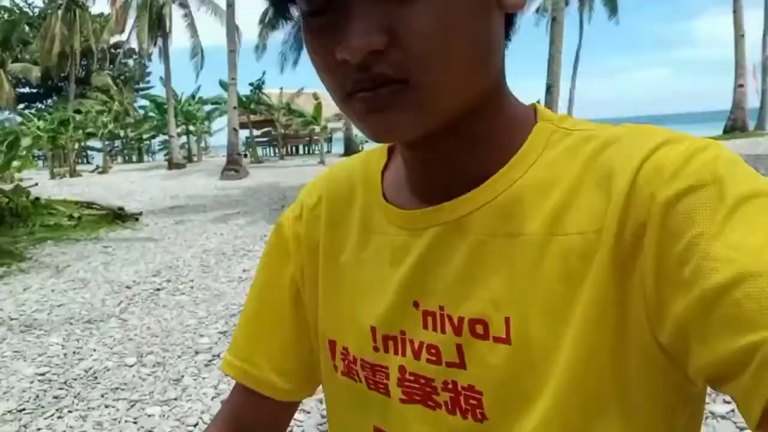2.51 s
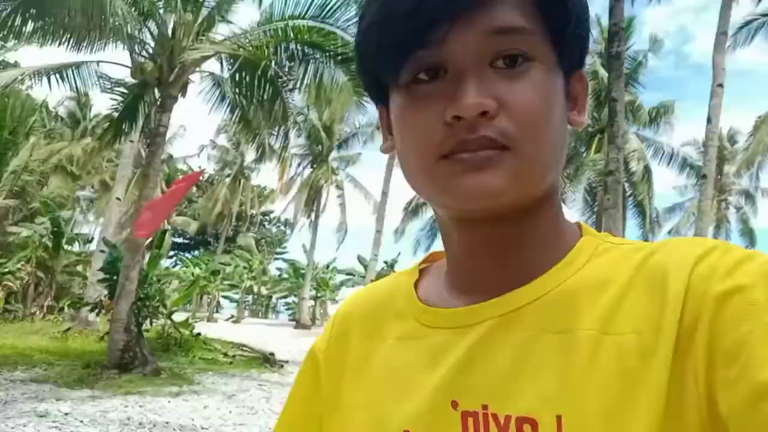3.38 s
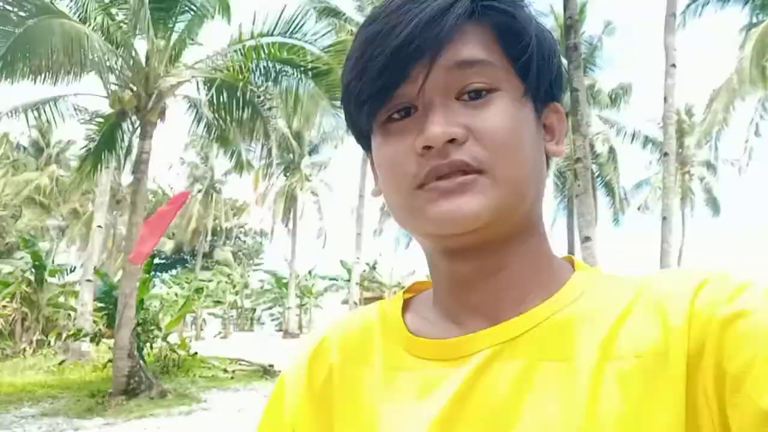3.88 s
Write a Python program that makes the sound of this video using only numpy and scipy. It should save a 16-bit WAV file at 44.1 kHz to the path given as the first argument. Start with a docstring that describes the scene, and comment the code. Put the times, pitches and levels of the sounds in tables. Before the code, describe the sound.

Someone walks at an even pace across a pebble beach, stones grinding and clicking underfoot, with a light breeze behind.

```python
"""Crunching footsteps at a steady pace on a beach of smooth loose pebbles.
Heel, then forefoot, each set off many small stone contacts over duller knocks deeper in the bed;
the stones then settle. Feet scuff, single stones clack and chink, trapped sand fizzes under load.
Behind: a shore hush, the rumble of a rising breeze and a thin tone that comes and goes."""
import sys
import numpy as np
from scipy import signal
from scipy.fft import rfft, irfft
from scipy.io import wavfile
from scipy.ndimage import uniform_filter1d

SR = 44100
rng = np.random.default_rng(int(sys.argv[2]) if len(sys.argv) > 2 else 0)


def put_to_file(sound):
    """Save the sound as 16-bit audio at rate SR, in the file named by the first command-line argument."""
    columns = np.atleast_2d(sound).T  # one column per channel
    safe = np.clip(columns, -1, 1)
    whole_steps = np.round(safe * 32767)
    wavfile.write(sys.argv[1], SR, whole_steps.astype(np.int16))


N = 176716
TIME_S = np.arange(N) / SR

# Table levels are relative, ahead of layer gains and filters.
# footfalls: heel (t/s, crunch level/dB, knock level/dB, hold/s), forefoot (same four),
# top stone f/Hz, buried stone f/Hz
FOOTFALLS = [(-0.02, -17.5, -46.5, .008, 0.046, -37, -56, .026, 4050, 600),
             (0.536, -27.5, -54, .025, 0.575, -32, -47.5, .073, 3600, 630),
             (1.093, -21, -40.5, .015, 1.15, -41, -61, .023, 3500, 660),
             (1.567, -27.5, -41, .035, 1.644, -50, -55, .015, 3300, 720),
             (2.111, -22.5, -41, .018, 2.183, -31, -43, .014, 3400, 700),
             (2.626, -15.5, -35, .004, 2.648, -22, -35, .022, 3600, 590),
             (3.04, -22.5, -47, .043, 3.113, -32, -39.5, .05, 3900, 720),
             (3.592, -20.5, -33, .01, 3.671, -39.5, -51, .031, 3150, 910)]
# foot brushes or pushes off: t/s, hold/s, crunch level/dB, knock level/dB
FOOT_SCUFFS = [(0.412, 0.004, -38.5, -45.5), (0.491, 0.04, -49, -55.5), (0.7, 0.096, -49.1, -63.5),
               (0.898, 0.075, -51.5, -59.5), (0.969, 0.098, -37.5, -49), (1.468, 0.077, -56.5, -62),
               (1.685, 0.068, -43.0, -56), (2.014, 0.064, -52.0, -58.5), (2.463, 0.086, -48.5, -55.5),
               (2.59, 0.0071, -23, -40), (2.904, 0.05, -44.5, -55), (2.997, 0.021, -38.5, -39.5),
               (3.203, 0.057, -36.5, -46.5), (3.277, 0.005, -29, -44.5), (3.475, 0.034, -47.7, -62.5),
               (3.508, 0.069, -44, -50.5)]
# single stones slip and strike: t/s, level/dB (first 5 ms), f/Hz, rattle/ms
STONE_CLACKS = [(0.0205, -10, 5960, 3.6), (0.072, -32, 3540, 4.2), (0.1092, -33.5, 3450.0, 3.4),
                (0.1638, -39, 3940.0, 2.9), (0.24, -62, 4850, 2.9), (0.3252, -54.5, 4130, 4.1),
                (0.4115, -28.0, 3120, 3.3), (0.5292, -25.5, 3500.0, 5.1), (0.5471, -24.5, 3860.0, 3.4),
                (0.553, -25.5, 3480, 2.2), (0.585, -21, 3580, 6.5), (0.597, -22, 3400, 4.87),
                (0.6192, -30, 3000.0, 2.7), (0.6355, -21.5, 3900.0, 4.1), (0.6834, -38.5, 3090.0, 1.8),
                (0.76, -40.5, 3824, 2.9), (0.9073, -46.5, 2110.0, 2.3), (0.9743, -34.5, 3260, 2.1),
                (1.013, -23, 4743, 2.8), (1.0454, -31, 3030, 4.7), (1.0673, -18, 4078, 3.78),
                (1.0874, -22.5, 3350, 1.6), (1.1545, -31.5, 3440.0, 5.1), (1.169, -32, 2280, 1.6),
                (1.2298, -44, 3644, 2.9), (1.476, -45.5, 1590.0, 5.1), (1.5046, -47.4, 2827, 2.5),
                (1.535, -44, 3700, 4.3), (1.5645, -25.5, 1970, 2.45), (1.5746, -23.2, 3130, 2.4),
                (1.581, -20.1, 3703, 5.3), (1.593, -21.5, 3730, 2.8), (1.6375, -28.5, 3430, 4.8),
                (1.6547, -28, 2370, 1.6), (1.6918, -35, 3040, 2.1), (1.7162, -22, 5996, 2.4),
                (1.7406, -21, 4530, 2.0), (1.7876, -33.5, 3895, 5.6), (1.8315, -48.5, 3796, 3.9),
                (2.103, -18.5, 4200.0, 4.7), (2.1548, -32, 2920, 3.8), (2.212, -27.5, 3500.0, 2.26),
                (2.2497, -34, 3010, 2.5), (2.3063, -48, 2160.0, 2.9), (2.458, -35.5, 3039, 3.95),
                (2.5933, -18.5, 4567, 2.8), (2.6236, -12.5, 4070, 5.1), (2.6495, -13, 4320, 5.3),
                (2.7343, -34.5, 3582, 3.78), (2.751, -26.5, 3240, 3.7), (2.799, -35.0, 3060, 2.5),
                (2.835, -38.5, 3845, 3.24), (2.9046, -38.5, 3570, 3.1), (2.9441, -41.5, 2298, 2.5),
                (3.012, -28, 2500, 6.3), (3.0437, -12.5, 5140.0, 10.3), (3.0837, -23, 4256, 2.3),
                (3.09, -20, 4501, 3.4), (3.1286, -24.5, 3540, 4), (3.1399, -22.5, 4640, 4.8),
                (3.1636, -17, 3840, 4.2), (3.2143, -31, 4039, 1.98), (3.2255, -35, 3020.0, 2.46),
                (3.2729, -23.5, 3224, 2.74), (3.3032, -38.5, 3180, 2.1), (3.575, -21.1, 3651, 2.51),
                (3.6037, -12, 4110.0, 2.85), (3.6575, -23.5, 3800, 1.91)]
# small hard stones ring: t/s, level/dB, f/Hz, ring/ms
STONE_CHINKS = [(0.0204, -26, 8520, 2.5), (0.42, -35, 8230, 2), (0.598, -32.5, 8650, 2.9),
                (0.636, -28, 11760, 4.2), (0.96, -38.5, 9140, 3.4), (1.013, -35, 9910, 3),
                (1.099, -21.5, 8530, 1.2), (1.558, -29, 9130, 2.7), (1.581, -30, 9560, 2.3),
                (1.716, -22, 10000, 1), (2.1055, -33, 10520, 1.37), (2.4653, -48.5, 9444, 4.1),
                (2.5139, -35.5, 9735, 3.84), (2.556, -45, 9900, 6), (2.5824, -41.5, 9914, 3),
                (2.6282, -29, 9050, 3.5), (3.0093, -33, 9900, 2.9), (3.042, -30.5, 9002, 3),
                (3.1203, -36.5, 10100, 2.7), (3.6017, -26, 8765, 3)]
# pebble bed response: f/Hz, level/dB
BED_RESPONSE = [(150, -28), (500, -4), (1000, -4), (1600, 1), (2200, -2), (3500, 1.5), (4300, -0.5),
                (5400, 3.5), (6500, -4.5), (7500, -7.5), (10500, -1), (13000, -38), (15500, -11)]
# shore hush spectrum: f/Hz, level/dB
HUSH_SPECTRUM = [(20, -43), (45, -16), (100, -4.5), (200, -8), (400, -12.5), (800, -14), (1500, -15),
                 (3200, -15), (5000, -23.5), (7200, -25), (8200, -40.5), (15000, -47)]
# breeze gusts: centre t/s, half length/s, level/dB
BREEZE_GUSTS = [(2.22, 0.023, -58.5), (2.55, .04, -53), (2.68, 0.03, -53), (2.96, 0.063, -57),
                (3.41, 0.033, -57), (3.73, 0.025, -54), (3.87, 0.041, -59.5)]
# swells of the thin tone: centre t/s, half length/s, level/dB
THIN_TONE_SWELLS = [(0.42, .06, -58), (0.78, .1, -59), (1.8, .08, -55.5), (2.82, .14, -61),
                    (3.78, .12, -62)]

ATTACK_S, PRESS_RELEASE_DB_PER_S, SCUFF_RELEASE_DB_PER_S = .011, 512, 606.5
SETTLE_DB, SETTLE_DB_PER_S = -12.5, 130  # level re press
STIR_DB = -68  # stones between steps


def footsteps():
    """Top stones, coloured by the bed, sound over buried stones, grit and chinks."""
    top_db, buried_db = footwork_db(buried=False), footwork_db(buried=True)
    stones = colour(crunch(top_db) + clacks(), BED_RESPONSE) + deep_knocks(buried_db)
    stones = stones + resonance(stones, 1270, width_hz=60)  # blows leave a faint narrow ring
    return muffle(stones) + grit(top_db) + chinks()


def footwork_db(buried):
    """Level of top or buried stones: heel and forefoot presses, settling, scuffs."""
    power = undb(STIR_DB) ** 2
    for step in FOOTFALLS:
        for start_s, *db, hold_s in (step[:4], step[4:8]):
            push = press(start_s, hold_s, PRESS_RELEASE_DB_PER_S)
            settling = undb(SETTLE_DB) * press(start_s, hold_s, SETTLE_DB_PER_S)
            power += (undb(db[buried]) * (push + settling)) ** 2
    for start_s, hold_s, *db in FOOT_SCUFFS:
        power += (undb(db[buried]) * press(start_s, hold_s, SCUFF_RELEASE_DB_PER_S)) ** 2
    return 10 * np.log10(power)


def press(start_s, hold_s, release_db_per_s):
    """Gain of one push on the stones: quick rise, hold, steady decay."""
    early_s = np.maximum(start_s - TIME_S, 0)
    late_s = np.maximum(TIME_S - start_s - hold_s, 0)
    return np.exp(-2 * early_s / ATTACK_S) * undb(-release_db_per_s * late_s)


def stone_hz(buried):
    """Each step finds stones of another size; larger ones ring lower."""
    steps = np.array(FOOTFALLS)
    return np.interp(TIME_S, steps[:, 0], steps[:, 9 if buried else 8])


def crunch(level_db):
    """Top stones grind past each other under the sole."""
    return undb(-1) * grains(level_db, stone_hz(buried=False), slots=10000, octaves=1.792,
                             spread_db=13.5, cycles=3.6, rattle_db=-27.5, samples=384)


def clacks():
    """Single stones snap out from under the foot and hit their neighbours."""
    times_s, db, hz, rattle_ms = np.transpose(STONE_CLACKS)
    sounds = contacts(hz, cycles=1.25, rattle_ms=np.clip(rattle_ms, .5, 10),
                      rattle_db=-22.5, samples=1024)
    onset_rms = np.sqrt(np.mean(sounds[:, :SR // 200] ** 2, axis=1))
    return undb(1) * place(times_s, sounds * (undb(db) / onset_rms)[:, None])


def deep_knocks(level_db, low_cut_hz=344):
    """Weight shifts larger, buried stones, still too small to radiate much bass."""
    knocks = undb(-2.5) * grains(level_db, stone_hz(buried=True), slots=2500, octaves=.829,
                                 spread_db=7.5, cycles=3.6, rattle_db=-47.5, samples=1536)
    return signal.sosfilt(signal.butter(2, low_cut_hz, "highpass", fs=SR, output="sos"), knocks)


def chinks(rise_s=.00023, crack_s=.0022):
    """Small stones ring briefly at their own high pitch after a tiny crack of contact."""
    times_s, db, hz, ring_ms = np.transpose(STONE_CHINKS)[:, :, None]
    t = TIME_S[:SR // 25]
    ring = np.sin(2 * np.pi * hz * t) * (1 - np.exp(-t / rise_s)) * np.exp(-1000 * t / ring_ms)
    noise = rng.standard_normal(ring.shape)
    crack = resonance(resonance(noise, 9500, 5000), 9500, 5600) * np.exp(-t / crack_s)
    return undb(-3.5) * place(times_s[:, 0], undb(db) * (ring + undb(1.5) * crack))


def grit(crunch_db, load_db=-23.5, extra_db_per_db=.2):
    """Sand crushed between the stones fizzes faintly, mostly under full weight."""
    fizz_db = crunch_db + extra_db_per_db * (crunch_db - load_db)
    return undb(-32.5) * grains(fizz_db, centre_hz=8300, slots=10000, octaves=.99,
                                spread_db=13, cycles=5.6, rattle_db=-28, samples=192)


def grains(level_db, centre_hz, slots, octaves, spread_db, cycles, rattle_db, samples):
    """Random contacts, at most one per time slot; under more load more stones move and strike harder."""
    jitter, pitch, strength, chance = rng.random((slots, 4)).T
    times_s = (np.arange(slots) + jitter) * N / SR / slots
    db = np.interp(times_s, TIME_S, level_db)
    hz = np.interp(times_s, TIME_S, centre_hz * np.ones(N)) * 2 ** (octaves * (pitch - .5))
    moving_share = np.clip(undb(.22 * (db - level_db.max())), .06, 1)
    moves = chance < moving_share
    force = unit_rms(undb(spread_db * strength[moves] ** 2))
    gap_samples = N / slots / moving_share[moves]
    gain = force * undb(db[moves]) * np.sqrt(gap_samples)
    sounds = contacts(hz[moves], cycles, rattle_ms=1.5, rattle_db=rattle_db, samples=samples)
    return place(times_s[moves], sounds * gain[:, None])


def contacts(hz, cycles, rattle_ms, rattle_db, samples):
    """One unit-energy row per stone: a blow and quick rebounds excite three short-lived modes."""
    t, hz = TIME_S[:samples], hz[:, None]
    mode_hz = hz * rng.uniform([.45, .9, 1.3], [.7, 1.1, 1.7], (len(hz), 3))
    ring = sum(gain * np.sin(2 * np.pi * mode_hz[:, [k]] * t) for k, gain in enumerate([.45, -1, .65]))
    # rounded stones press together over about one cycle
    ring *= (1 - np.exp(-t * hz)) * np.exp(-t * hz / cycles)
    rattle_s = np.reshape(rattle_ms, (-1, 1)) / 1000
    # cubed noise: a few strong rebounds among many slight ones
    blows = undb(rattle_db) * rng.standard_normal(ring.shape) ** 3 * np.exp(-t / rattle_s)
    blows[:, 0] = rng.choice([-1, 1], len(hz))
    sounds = signal.fftconvolve(blows, ring, axes=1)[:, :samples]
    return sounds / np.linalg.norm(sounds, axis=1, keepdims=True)


def muffle(x, edge_hz=7320, leak_db=-14):
    """The stones' sound drops steeply above about 7.3 kHz; only a faint share of the top treble remains."""
    low_pass = signal.ellip(7, .5, 60, edge_hz, fs=SR, output="sos")
    return signal.sosfilt(low_pass, x) + undb(leak_db) * x


def ground_scatter(x, wet_db=-15.5, decay_s=.012):
    """Stony ground throws back a short diffuse tail."""
    t = TIME_S[:SR // 8]
    tail = rng.standard_normal(len(t)) * np.exp(-t / decay_s)
    return x + undb(wet_db) * signal.fftconvolve(x, tail / np.linalg.norm(tail))[:N]


def shore_hush(start_db=-61.5, rise_db_per_s=1, wander_db=.5):
    """Soft broad noise that rises with the breeze."""
    hush = unit_rms(colour(rng.standard_normal(N), HUSH_SPECTRUM))
    return hush * undb(start_db + rise_db_per_s * TIME_S + wander_db * wander(rate_hz=4.703))


def breeze(start_db=-66, rise_db_per_s=2.18, flutter_db=3):
    """Low wind rumble that freshens steadily, flutters and gusts."""
    rumble = unit_rms(resonance(resonance(rng.standard_normal(N), 108, 110), 108, 130))
    level_db = start_db + rise_db_per_s * TIME_S + flutter_db * wander(rate_hz=18)
    return rumble * (undb(level_db) + swells(BREEZE_GUSTS))


def thin_tone(rest_db=-68):
    """A narrow band of noise swells now and then."""
    tone = unit_rms(resonance(resonance(rng.standard_normal(N), 1252, 42), 1360, 97))
    return tone * (undb(rest_db) + swells(THIN_TONE_SWELLS))


def swells(rows):
    """Summed gain of bell-shaped swells."""
    return sum(undb(db) * np.exp(-((TIME_S - centre_s) / half_s) ** 2) for centre_s, half_s, db in rows)


def wander(rate_hz):
    """Smooth random drift, spread near 1."""
    samples = int(SR / rate_hz)
    stairs = np.repeat(rng.standard_normal(N // samples + 1), samples)
    return 1.3 * uniform_filter1d(uniform_filter1d(stairs, samples), samples)[:N]


def place(times_s, sounds):
    """Sum rows of sounds at their start times."""
    index = (times_s * SR).astype(int)[:, None] + np.arange(sounds.shape[1])
    return np.bincount(index.ravel(), sounds.ravel(), N)[:N]


def colour(x, points, taps=2048):
    """Minimum-phase filter through (f/Hz, level/dB) points."""
    hz, db = np.transpose(points)
    bin_hz = np.arange(taps // 2 + 1) * SR / taps
    bin_db = np.interp(np.log(bin_hz + 1), np.log(hz), db)
    cepstrum = irfft(np.log(undb(bin_db)))
    cepstrum[1:taps // 2] *= 2
    cepstrum[taps // 2 + 1:] = 0
    return signal.fftconvolve(x, irfft(np.exp(rfft(cepstrum))))[:N]


def resonance(x, hz, width_hz):
    """Two-pole band-pass, gain 1 at centre."""
    return signal.lfilter(*signal.iirpeak(hz, hz / width_hz, fs=SR), x)


def undb(db):
    """Decibels to gain."""
    return 10 ** (np.asarray(db) / 20)


def unit_rms(x):
    """Scale to rms 1."""
    return x / np.sqrt(np.mean(x ** 2))


def scene():
    """Steps on pebbles over the shore background, mono."""
    return (ground_scatter(footsteps()) + shore_hush() + breeze() + thin_tone())[None]


def record(dry, ceiling=1.5, top_hz=15700):
    """Soft clip of the loudest peaks, then a steep low-pass."""
    rounded = ceiling * np.tanh(dry / ceiling)
    return signal.sosfilt(signal.ellip(10, .2, 80, top_hz, fs=SR, output="sos"), rounded)


dry = scene()
out = record(dry)
put_to_file(out)
```